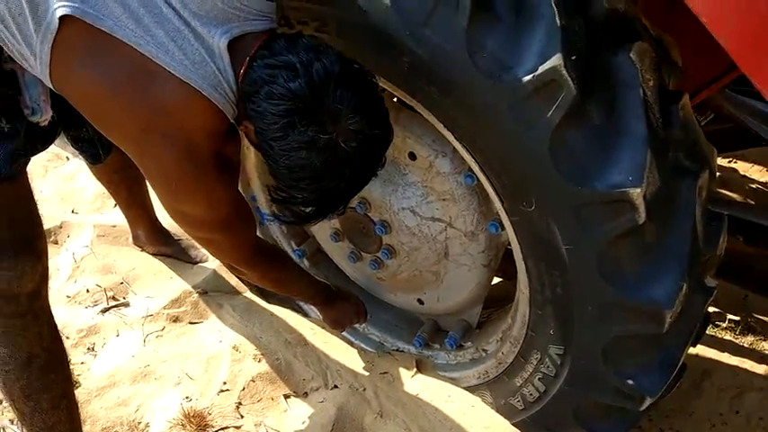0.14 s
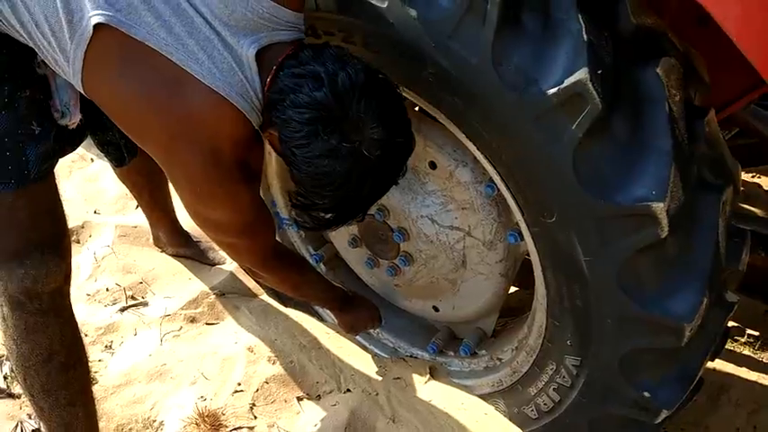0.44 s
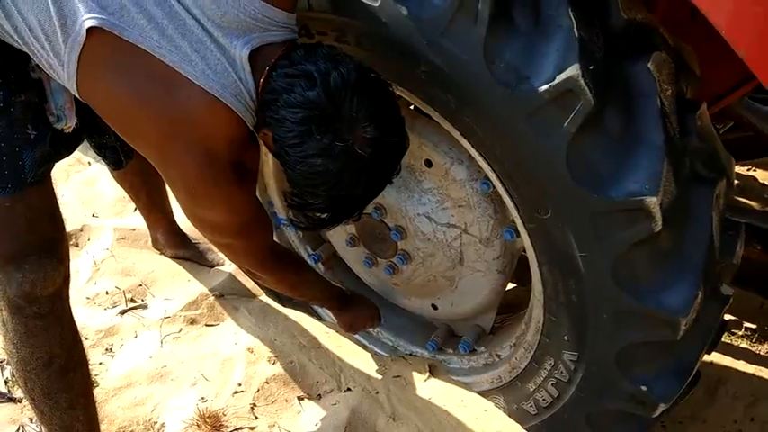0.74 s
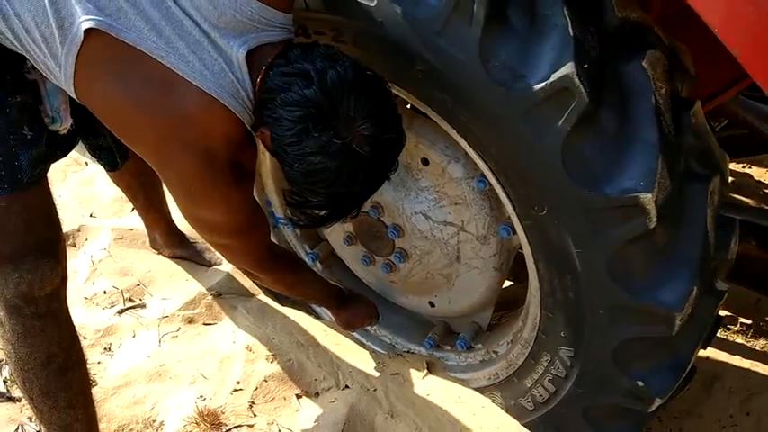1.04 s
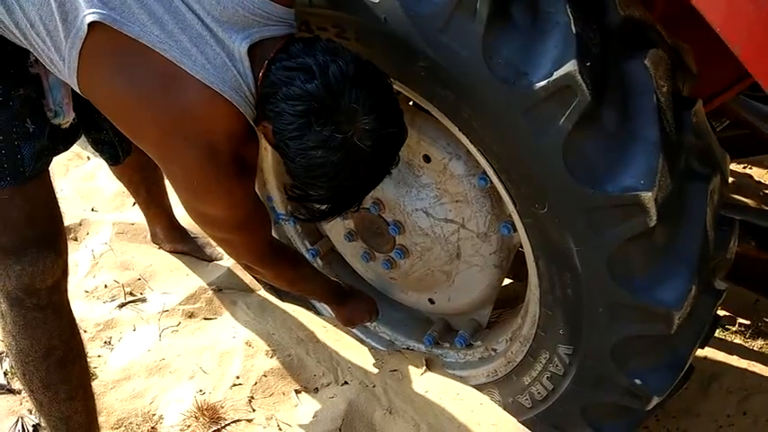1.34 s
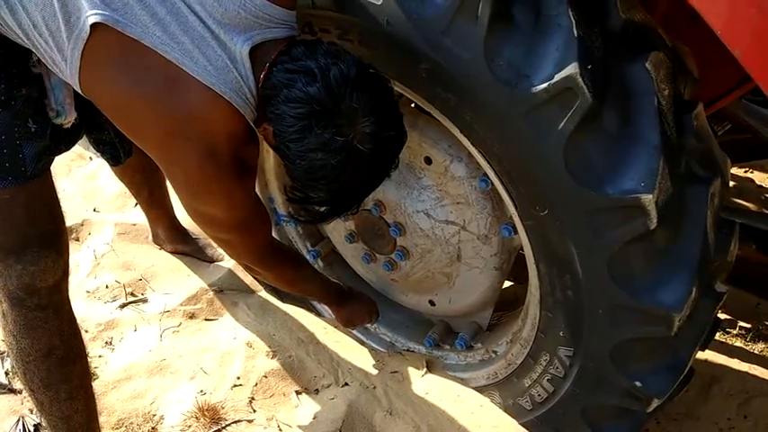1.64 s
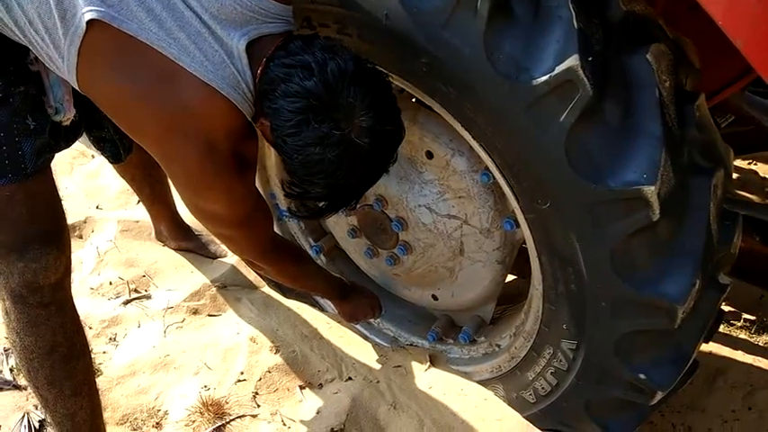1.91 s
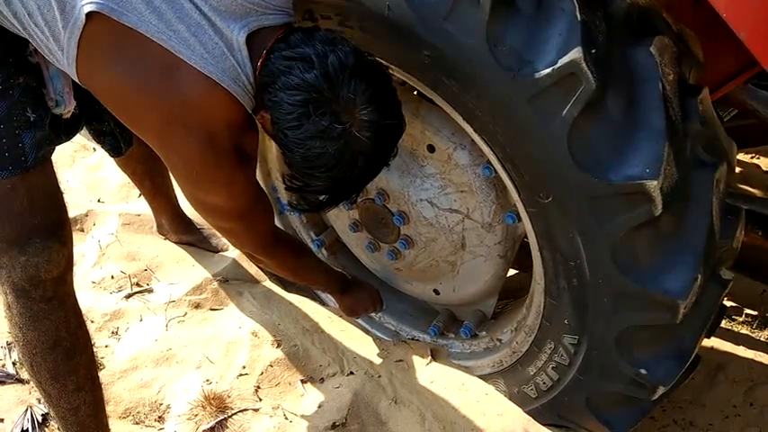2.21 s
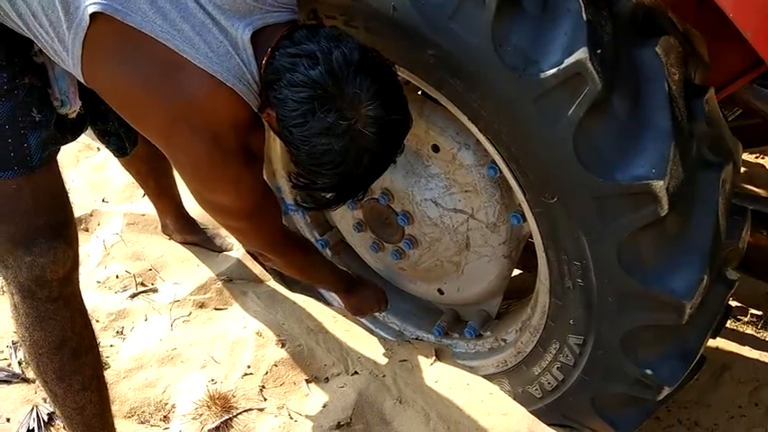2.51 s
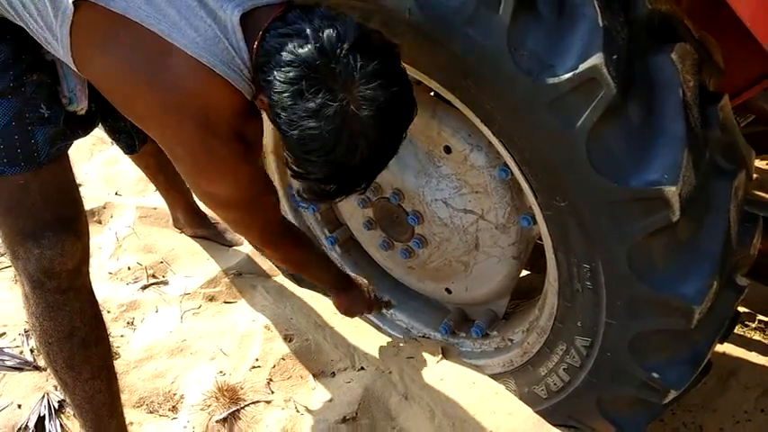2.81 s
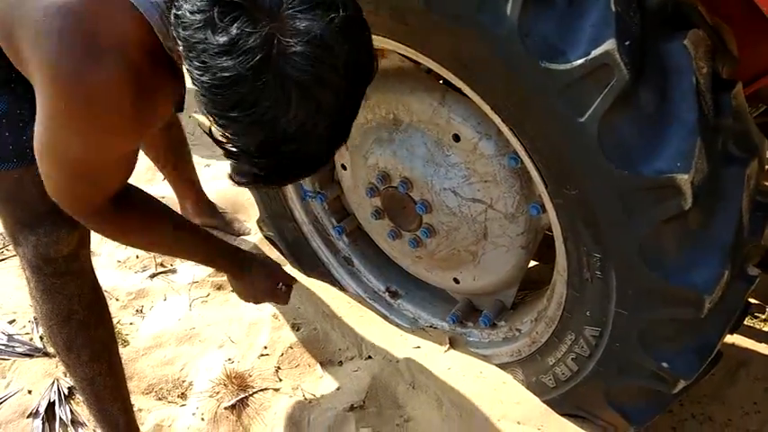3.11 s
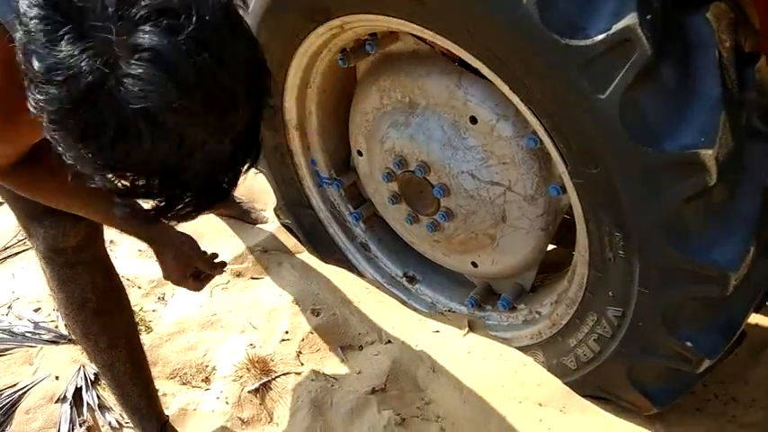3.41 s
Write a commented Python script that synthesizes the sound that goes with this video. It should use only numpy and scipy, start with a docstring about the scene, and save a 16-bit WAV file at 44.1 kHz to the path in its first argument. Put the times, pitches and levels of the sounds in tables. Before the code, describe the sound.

Air escapes from a tractor tyre valve in a bright, dense, steady hiss from the start, close to a stereo microphone outdoors and stronger on the left. Irregular low wind puffs and thumps bump the microphone, mostly left, with faint finger scuffs around 1.65 and 2.6 seconds. At about 2.77 seconds the hiss snaps off, leaving a very faint thin leak, low rumble and a few wind thumps around 3.2-3.4 seconds.

```python
"""Air hisses from the valve of a tractor tyre outdoors, close to two microphone ports, over a faint low rumble.
The jet dips slightly, then shuts within hundredths of a second and leaves a thin leak. Fingers scuff at
the valve; wind puffs and thumps, each on one port. Hiss is shaped noise coloured by the wheel; scuffs,
puffs and rumble are filtered noise; thumps are short pressure swings."""
import sys
import numpy as np
from scipy import signal
from scipy.fft import rfft, irfft, next_fast_len
from scipy.io import wavfile
from scipy.ndimage import map_coordinates

SR = 44100
rng = np.random.default_rng(int(sys.argv[2]) if len(sys.argv) > 2 else 0)


def generate_wav(sig):
    """Save sig (samples, or channels by samples) to the path in sys.argv[1] as 16-bit PCM at SR."""
    pcm = np.round(np.clip(np.atleast_2d(sig).T, -1, 1) * 32767).astype(np.int16)
    wavfile.write(sys.argv[1], SR, pcm)


N = 156555

# Open jet spectrum per port. Each row: frequency in Hz, relative density in dB per Hz.
JET_LEFT_SPECTRUM = [(600, -30), (1300, -30.5), (3400, -29.5), (5400, -22), (7700, -17.5), (8400, -16),
                     (9600, -7), (10500, -10), (11400, -4), (12300, -2), (14600, -2.5), (15800, -9)]
JET_RIGHT_SPECTRUM = [(600, -29), (1300, -28.5), (2200, -20), (3800, -23.5), (6500, -15), (8400, -11.5),
                      (9600, -3), (10500, -7.5), (11400, 1), (12300, -6.5), (14600, -9), (15800, -17.5)]
# Spectrum of the leak past the closed valve. Each row: frequency in Hz, relative density in dB per Hz.
LEAK_LEFT_SPECTRUM = [(600, -28), (1600, -35), (2600, -27), (3600, -26), (5500, -21), (6300, -8.5),
                      (7400, -19), (8700, -5), (10500, -5), (12300, 4.7), (14000, 5.5), (15700, 0.5)]
LEAK_RIGHT_SPECTRUM = [(600, -29), (1600, -31), (2600, -29.5), (3600, -29), (5500, -21.5), (6300, -18),
                       (7400, -18), (8700, -7.5), (10500, -6.5), (12300, -11.5), (14000, -16), (15700, -32)]
# Left-right likeness of the noise. Each row: frequency in Hz, correlation from 0 to 1.
LIKENESS = [(500, 0.89), (3000, 1), (6000, 0.73), (10000, 0.68), (15000, 0.13)]
# Puffs of wind. Each row: middle in seconds, length in seconds, level in dB ahead of the port
# roll-off, centre in Hz, port (0 left, 1 right).
WIND_PUFFS = [(0.05, 0.083, -41, 111, 1), (0.16, 0.098, -37.5, 175, 1), (0.261, 0.05, -47, 69, 0),
              (0.347, 0.069, -29.5, 86, 0), (0.392, 0.018, -35.5, 116, 1), (0.44, 0.04, -31, 81, 0),
              (0.582, 0.019, -35.5, 83, 0), (0.627, 0.018, -39, 86, 1), (0.827, 0.068, -45, 74, 1),
              (0.88, 0.06, -38, 64.4, 0), (1.004, 0.054, -43.5, 105, 0), (1.185, 0.043, -34, 89, 0),
              (1.276, 0.06, -33.5, 84, 0), (1.37, 0.043, -30.5, 106, 0), (1.6, 0.05, -31.5, 110, 0),
              (1.665, 0.055, -31, 88.5, 0), (1.691, 0.079, -40.5, 125, 1), (1.719, 0.034, -41, 76, 0),
              (1.824, 0.04, -37, 104, 1), (1.896, 0.035, -46.5, 83, 0), (2.116, 0.076, -49, 74.4, 1),
              (2.141, 0.15, -41.5, 82, 0), (2.191, 0.097, -39, 64, 1), (2.323, 0.087, -34.5, 92, 0),
              (2.405, 0.032, -37, 76, 1), (2.437, 0.055, -31.5, 68.5, 0), (2.481, 0.045, -45, 93, 1),
              (2.625, 0.026, -48.5, 92, 1), (2.971, 0.11, -43.5, 81, 0), (3.044, 0.029, -32, 60, 1),
              (3.137, 0.13, -46.5, 69, 1), (3.189, 0.057, -31, 69.7, 0), (3.346, 0.048, -35.5, 88.5, 0),
              (3.425, 0.053, -46.5, 70, 0)]
# Spectrum of a puff centred at PUFF_REF_HZ. Each row: frequency in Hz, relative density in dB per Hz.
PUFF_SPECTRUM = [(20, -27), (35, -15.5), (55, 1), (80, -0.5), (130, -6.5), (200, -15.5), (300, -25.5),
                 (420, -45.5), (800, -80), (2000, -100)]
# Sharp wind thumps. Each row: middle in seconds, envelope peak in dB ahead of the port roll-off,
# centre in Hz, port (0 left, 1 right).
WIND_THUMPS = [(.135, -28, 170, 1), (.162, -29.5, 232, 1), (.191, -30, 230, 1), (.326, -23.5, 166, 0),
               (.395, -17.5, 98, 0), (0.429, -21.5, 110, 0), (.629, -26.5, 92.6, 0), (0.995, -27.5, 143, 0),
               (1.12, -26, 125, 0), (1.211, -25, 94, 0), (1.226, -18, 83, 0), (1.275, -27.5, 159, 0),
               (1.328, -20.5, 200, 0), (1.377, -22, 162, 0), (1.415, -31.5, 150, 1), (1.572, -21, 103, 0),
               (1.596, -23, 144, 0), (1.604, -20, 206, 0), (1.617, -20, 104, 0), (1.654, -27, 130, 0),
               (1.748, -27.5, 86, 0), (1.834, -34, 155, 1), (2.132, -27, 184, 0), (2.172, -25, 82, 0),
               (2.194, -29, 123, 0), (2.302, -29.5, 153, 0), (2.936, -36, 150, 0), (3.237, -27, 136, 0),
               (3.295, -24, 84, 0), (3.325, -21, 94, 0), (3.373, -23, 83.4, 0)]
# Hand scuffs. Each row: middle in seconds, Gaussian sigma in seconds, peak level in dB (mean of the ports),
# centre in Hz, Gaussian sigma in octaves, left minus right in dB.
HAND_SCUFFS = [(0.622, 0.02, -61, 2200, 0.34, 5), (1.039, 0.0011, -52.5, 600, 2, 16),
               (1.636, 0.0038, -52.5, 503, 0.24, 13), (1.662, 0.054, -55, 1940, 1.24, 11.5),
               (2.595, 0.0028, -49, 1500, 3, 17), (2.657, 0.057, -60.5, 1900, 0.6, 1),
               (2.962, 0.012, -72.5, 815, 0.25, 3), (3.326, 0.015, -77.5, 2400, .25, -10)]
# Distant rumble spectrum. Each row: frequency in Hz, relative density in dB per Hz.
RUMBLE_SPECTRUM = [(20, -24), (42, -18), (55, -4.5), (95, 7.5), (125, -31), (250, -23.5), (500, -33),
                   (2000, -43.5), (8000, -58)]

JET_DB, LEAK_DB = [-29, -34.5], [-47, -57]  # (left, right)
SHUT_START_S, SHUT_TAU_S = 2.769, 0.0079
DIP_DB, DIP_WIDTH_S = -0.5, 0.006  # dip centred half a width before the valve starts to close
FLUTTER_DB, FLUTTER_KNOTS_PER_S = 0.5, 39.96
DRIFT_DB, DRIFT_KNOTS_PER_S = 0.13, 4.37
RIM_DELAY_S, RIM_ECHO_GAIN = 0.0026, 0.043
SCATTER_DB, SCATTER_T60_S = -0.5, 0.035  # wheel, arm and ground
PUFF_REF_HZ, PUFF_EDGE_S = 94.4, 0.0054
EDDY_DB, EDDY_TAU_S = -17, 0.056  # relative to the puff's core, before filtering
THUMP_TAU_CYCLES = 0.32
RUMBLE_DB = -65.5  # ahead of the port roll-off
TOP_HZ, PORT_LOW_HZ = 15850, 40


def amp(db):
    """Decibels to linear gain."""
    return 10 ** (np.asarray(db) / 20)


def unit(x):
    """Scale each channel to an RMS of one."""
    return x / np.sqrt(np.mean(x ** 2, axis=-1, keepdims=True) + 1e-20)


def along(points, hz):
    """Interpolate (Hz, value) points on a log frequency axis."""
    f, v = np.transpose(points)
    return np.interp(np.log(hz + 1), np.log(f + 1), v)


def wobble(knots_per_s):
    """A smooth curve through random knots."""
    knots = rng.standard_normal(int(N * knots_per_s / SR) + 4)
    return map_coordinates(knots, [np.arange(N) * knots_per_s / SR])


def filtered(x, response):
    """Multiply the spectrum of x by a response of frequency."""
    n = x.shape[-1]
    m = next_fast_len(n + 8192)  # zero padding limits wrap-around
    return irfft(rfft(x, m) * response(np.fft.rfftfreq(m, 1 / SR)), m)[..., :n]


def noise_pair():
    """White noise at two ports; mid and side shares set their correlation."""
    def mid_side_gains(hz):
        angle = np.arccos(np.clip(along(LIKENESS, hz), 0, 0.99)) / 2
        return np.array([np.cos(angle), np.sin(angle)])

    mid, side = filtered(rng.standard_normal((2, N)), mid_side_gains)
    return np.array([mid + side, mid - side])


def wheel(x):
    """One bounce off the steel rim and a short decaying scatter ripple the spectrum."""
    t = np.arange(SR // 10) / SR
    tail = rng.standard_normal((2, len(t))) * amp(-60 * t / SCATTER_T60_S)
    tail /= np.linalg.norm(tail, axis=1, keepdims=True)
    rim = filtered(x, lambda hz: 1 + RIM_ECHO_GAIN * np.exp(-2j * np.pi * hz * RIM_DELAY_S))
    scatter = signal.fftconvolve(x, tail, axes=1)[:, :N]
    return rim + amp(SCATTER_DB) * scatter


def hiss(left, right, level_db):
    """Turbulent air is shaped noise, coloured by the wheel, with slight flutter and drift."""
    air = filtered(wheel(noise_pair()), lambda hz: amp([along(left, hz), along(right, hz)]))
    flutter_db = FLUTTER_DB * wobble(FLUTTER_KNOTS_PER_S)
    drift_db = DRIFT_DB * wobble(DRIFT_KNOTS_PER_S)
    return unit(air) * amp(level_db)[:, None] * amp(flutter_db + drift_db)


def valve():
    """The jet dips slightly and decays as the valve closes; the leak takes over."""
    t = np.arange(N) / SR
    opening = np.exp(-np.maximum(t - SHUT_START_S, 0) / SHUT_TAU_S)
    dip_shape = np.exp(-((t - SHUT_START_S + DIP_WIDTH_S / 2) / DIP_WIDTH_S) ** 2)
    jet = hiss(JET_LEFT_SPECTRUM, JET_RIGHT_SPECTRUM, JET_DB)
    leak = hiss(LEAK_LEFT_SPECTRUM, LEAK_RIGHT_SPECTRUM, LEAK_DB)
    return opening * amp(DIP_DB * dip_shape) * jet + (1 - opening) * leak


def outdoors():
    """Faint distant rumble: steady noise weighted to the lows."""
    rumble = filtered(noise_pair(), lambda hz: amp(along(RUMBLE_SPECTRUM, hz)))
    return amp(RUMBLE_DB) * unit(rumble)


def wind_puffs():
    """Each puff is a burst of low pressure swings on one port, amid weaker eddies."""
    out = np.zeros((2, N + 2 * SR))  # one spare second at each end
    t = np.arange(-SR // 4, SR // 4) / SR
    for middle_s, length_s, db, centre_hz, port in WIND_PUFFS:
        outside_s = np.abs(t) - length_s / 2
        gate = 0.5 - 0.5 * np.tanh(outside_s / PUFF_EDGE_S / 2)
        eddies = amp(EDDY_DB) * np.exp(-np.maximum(outside_s, 0) / EDDY_TAU_S)
        burst = rng.standard_normal(len(t)) * (gate + eddies)
        swirl = filtered(burst, lambda hz: amp(along(PUFF_SPECTRUM, hz * PUFF_REF_HZ / centre_hz)))
        # Total energy equals the stated RMS held for length_s.
        swirl *= amp(db) * np.sqrt(length_s * SR / np.sum(swirl ** 2))
        first = SR + round((middle_s + t[0]) * SR)
        out[int(port > 0.5), first:first + len(t)] += swirl
    return out[:, SR:SR + N]


def wind_thumps():
    """An eddy that strikes a port squarely gives one short swing of pressure."""
    t, out = np.arange(N) / SR, np.zeros((2, N))
    phases = rng.uniform(0, 2 * np.pi, len(WIND_THUMPS))
    for (middle_s, db, centre_hz, port), phase in zip(WIND_THUMPS, phases):
        cycles = (t - middle_s) * centre_hz
        near = np.abs(cycles) < 10
        envelope = 1 / np.cosh(cycles[near] / THUMP_TAU_CYCLES)
        swing = np.cos(2 * np.pi * cycles[near] + phase) * envelope
        out[int(port > 0.5), near] += amp(db) * swing
    return out


def hand():
    """Fingers rubbing the valve give Gaussian swells of band-limited noise."""
    t, out, rub = np.arange(N) / SR, np.zeros((2, N)), noise_pair()
    for middle_s, sigma_s, db, centre_hz, sigma_oct, pan_db in HAND_SCUFFS:
        band = unit(filtered(
            rub, lambda hz: np.exp(-0.5 * (np.log2((hz + 1) / centre_hz) / sigma_oct) ** 2)))
        swell = np.exp(-0.5 * ((t - middle_s) / sigma_s) ** 2)
        out += band * swell * amp([[db + pan_db / 2], [db - pan_db / 2]])
    return out


def scene():
    """Sum of valve, rumble, wind and hand."""
    return valve() + outdoors() + wind_puffs() + wind_thumps() + hand()


def record(dry):
    """The ports roll off the deepest bass; nothing passes at or above TOP_HZ."""
    def response(hz):
        bass_rolloff = hz ** 2 / np.sqrt(hz ** 4 + PORT_LOW_HZ ** 4)
        return (hz < TOP_HZ) * bass_rolloff

    return filtered(dry, response)


dry = scene()
out = record(dry)
generate_wav(out)
```